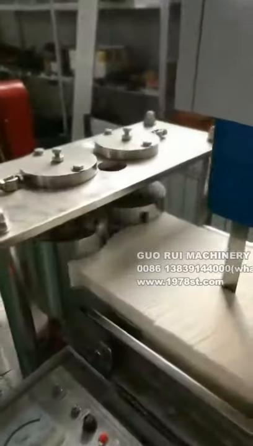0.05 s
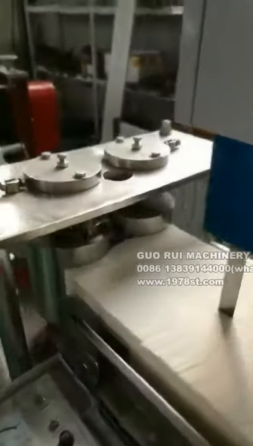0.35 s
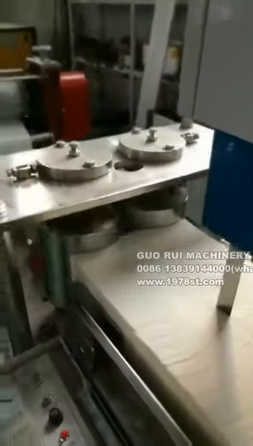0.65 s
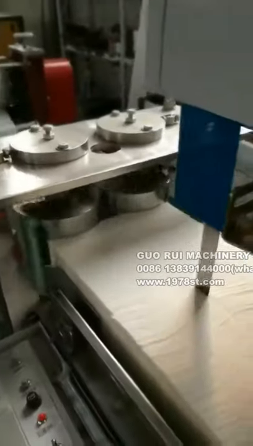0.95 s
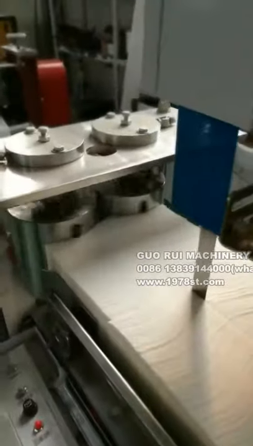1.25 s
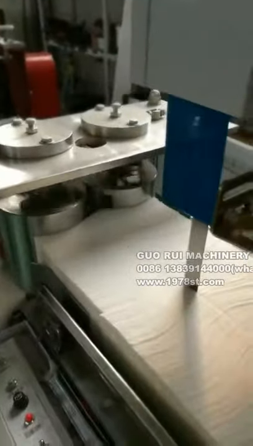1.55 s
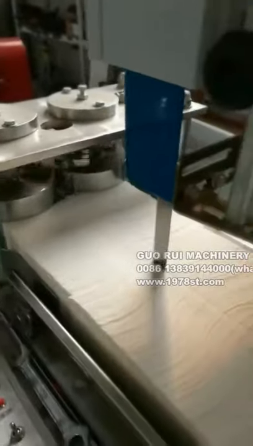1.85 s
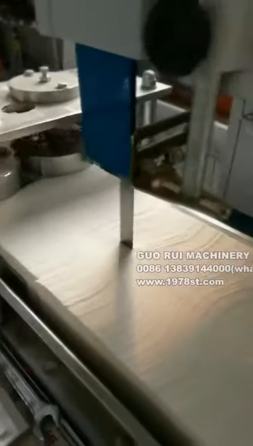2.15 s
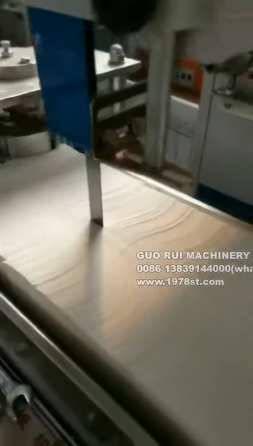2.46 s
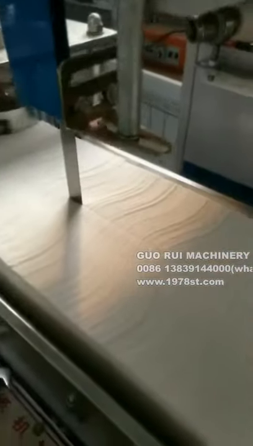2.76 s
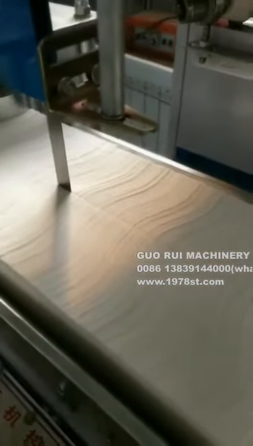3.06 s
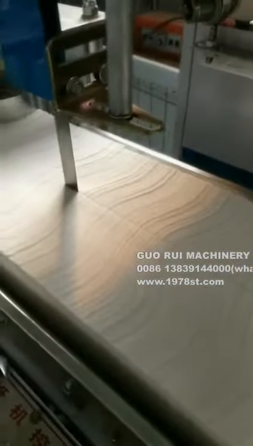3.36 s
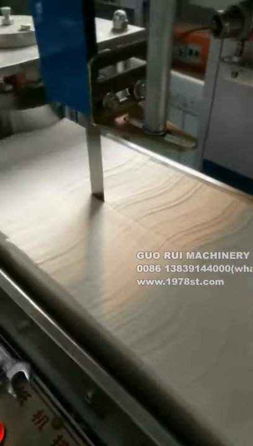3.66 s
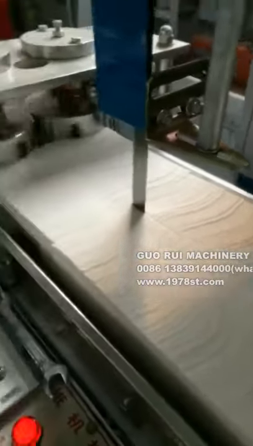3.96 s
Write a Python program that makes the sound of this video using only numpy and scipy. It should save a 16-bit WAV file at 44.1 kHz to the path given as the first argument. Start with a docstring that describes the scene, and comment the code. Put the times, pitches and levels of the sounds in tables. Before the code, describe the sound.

A band knife machine runs, its blade rasping and ringing rhythmically over a motor drone.

```python
"""A band knife runs over a stack of tissue paper, heard from close by in a workshop.
Twice per lap a high spot of the steel band scrapes past: once with a rasp, once with a knock and a
short bright ring of stick-slip oscillation. Sliding friction makes the band hiss in its guides and
excites narrow resonances. Behind it, motor and wheels drone and loose parts rattle."""
import sys
import numpy as np
from scipy import signal
from scipy.io import wavfile

SR = 44100
rng = np.random.default_rng(int(sys.argv[2]) if len(sys.argv) > 2 else 0)


def to_wav(sig):
    """Store sig (one row per channel, or 1-D mono) as 16-bit WAV at the path in sys.argv[1].

    Samples outside -1..1 are clipped; the rate is SR.
    """
    pcm = np.clip(np.atleast_2d(sig), -1, 1) * 32767
    pcm = np.round(pcm).astype(np.int16)
    wavfile.write(sys.argv[1], SR, pcm.T)  # frames by channels


N = 176400
T = np.arange(N) / SR
LAP_S, FIRST_RASP_S, FIRST_RING_S = .3394, .1535, .326  # period of the band; its first two passes
STRIKE_SHAPE = (.003, .0048, .014)  # attack, hold and release in seconds


def from_db(db):
    """Amplitude ratio of a level in decibels."""
    return 10 ** (np.asarray(db) / 20)


def unit_rms(x):
    """Normalisation to a mean square of one."""
    return x / np.sqrt(np.mean(x ** 2) + 1e-20)


def level(rows):
    """Gain over time, interpolated between (seconds, dB) points."""
    return from_db(np.interp(T, *np.transpose(rows)))


def at_hz(rows, hz):
    """Interpolation along a logarithmic frequency axis."""
    frequencies, values = np.transpose(rows)
    return np.interp(np.log(hz), np.log(frequencies), values)


def pan(db):
    """Constant-power panning; the balance db is left level minus right level."""
    return unit_rms(from_db(np.array([[db], [-db]]) / 2))


def drift(rate_hz):
    """Random fluctuation of rms 1: noise low-passed at rate_hz."""
    step, settle = 40, 2000
    r = np.exp(-2 * np.pi * rate_hz * step / SR)
    noise = rng.standard_normal(N // step + settle + 2)
    slow = signal.lfilter([1], [1, -2 * r, r * r], noise)[settle:]
    return np.interp(np.arange(N) / step, np.arange(len(slow)), unit_rms(slow))


def tone(hz, waver_hz, rate_hz):
    """Random frequency modulation of a sine of rms 1."""
    cycles = rng.random() + np.cumsum(hz + waver_hz * drift(rate_hz)) / SR
    return np.sqrt(2) * np.sin(2 * np.pi * cycles)


def swell(s, attack, hold, release):
    """Exponential rise and decay about a plateau centred on s; all in seconds."""
    return np.exp(np.minimum(T - s + hold / 2, 0) / attack - np.maximum(T - s - hold / 2, 0) / release)


def passes(first_s, dbs, shape):
    """Periodic excitation: one swell per lap, each at its own level."""
    lap = np.clip(np.round((T - first_s) / LAP_S), 0, len(dbs) - 1).astype(int)
    return from_db(dbs)[lap] * swell(first_s + LAP_S * lap, *shape)


def rubbed(modes):
    """Forced resonance: friction noise drives damped modes, reaching each side by a different path."""
    out, friction = 0, rng.standard_normal((2, N))
    for hz, width_hz, db, pan_db in modes:
        r = np.exp(-np.pi * width_hz / SR)
        ringing = signal.lfilter([1, 0, -1], [1, -2 * r * np.cos(2 * np.pi * hz / SR), r * r], friction)
        out = out + from_db(db) * pan(pan_db) * unit_rms(ringing)
    return out


# Likeness of the two sides. Each row: frequency in Hz, correlation coefficient.
CORRELATION = [(150, 0.96), (270, 0.76), (370, -0.47), (480, -0.74), (750, -0.48), (1050, 0.34),
               (1600, 0.31), (3000, -0.25), (5000, -0.061), (9500, 0.37), (13500, 0.99)]
# Direction of the noise. Each row: frequency in Hz, balance in dB.
BALANCE = [(200, 0.5), (300, -4.5), (520, 3), (750, 1.5), (1200, -1), (2200, 2.5), (5000, -0.5), (6800, 9),
           (8500, 22), (10000, -23), (12000, -1.5)]
def banded_noise(spectrum, flicker_db):
    """Partially coherent stereo noise of rms 1, whose bands flicker independently."""
    out, edges = 0, np.geomspace(22, 17000, 27)
    white = rng.standard_normal((2, 2, N))
    for k, (low, high) in enumerate(zip(edges, edges[1:])):
        bandpass = signal.butter(2, [low, high], "band", fs=SR, output="sos")
        mid, side = signal.sosfilt(bandpass, white[k % 2])
        hz = np.sqrt(low * high)
        alike = np.clip(at_hz(CORRELATION, hz), -1, 1)
        pair = np.sqrt(1 + alike) * mid + np.sqrt(1 - alike) * side * [[1], [-1]]
        gain = from_db(at_hz(spectrum, hz) + flicker_db * drift(18.4))
        out = out + gain * pan(at_hz(BALANCE, hz)) * pair
    return unit_rms(out)


def workshop(x, t60_s=.32):
    """Reverberation: echoes decay exponentially in eight feedback delays a side."""
    out = np.zeros((2, N))
    for k, lag in enumerate((rng.uniform(.011, .045, 16) * SR).astype(int)):
        loop, gain = x[k % 2].copy(), from_db(-60 * lag / SR / t60_s)
        for i in range(lag, N, lag):
            loop[i:i + lag] += gain * loop[i - lag:i][:N - i]
        out[k % 2] += (loop - x[k % 2]) * (-1) ** (k // 2)
    return out / 2


# Echoes off table and housing. Each row: left delay in seconds, right delay in seconds, gain in dB.
REFLECTIONS = [(.0029, 0.0031, -15.5), (.0047, .0041, -13.5), (.0073, 0.0098, -13)]
def reflected(x):
    """Comb filtering: short echoes from nearby steel interfere with the direct sound."""
    return x + sum(from_db(db) * np.array([np.interp(T - s, T, side) for s, side in zip(delays, x)])
                   for *delays, db in REFLECTIONS)


# Steady tones of the drive; those at 126.4, 132.5 and 138.5 Hz are harmonics of the lap rate, like the wheel
# tone. Each row: frequency in Hz, relative level in dB.
DRIVE_TONES = [(63.1, -47), (70.7, -46), (126.4, -41), (132.5, -43), (138.5, -41), (158, -46), (198.6, -42),
               (212, -41), (273.3, -42)]
# The wheel's five throbs per lap. Each row: time after the rasp in seconds, relative level in dB.
WHEEL_THROBS = [(.03, -23.5), (0.101, -30), (.177, -29.5), (0.248, -28), (0.284, -28.5)]
# Rumble of the frame. Each row: frequency in Hz, relative spectral density in dB.
RUMBLE_SPECTRUM = [(25, -42), (33, -36), (47, -13), (65, -13), (85, -8), (115, -2.5), (145, 0), (175, -3),
                   (215, 1.5), (280, -3), (360, -11.5), (600, -23), (1500, -52)]
# Loudness of the drive. Each row: time in seconds, gain in dB.
DRIVE_LEVEL = [(0, 2), (.4, 1.5), (.7, -1), (1.1, 1.5), (1.45, 0.5), (1.64, -3), (1.9, 0), (2.6, 0),
               (3.3, -1.5), (4, -1)]
def drive():
    """Forced vibration: steady drive tones and an amplitude-modulated wheel tone over the frame's rumble."""
    hum = sum(from_db(db + .5) * tone(hz, waver_hz=.31, rate_hz=4.8) for hz, db in DRIVE_TONES)
    one_lap = sum(from_db(db) * swell(LAP_S + lag_s, .015, .017, .021) for lag_s, db in WHEEL_THROBS)
    # The throbs' flanks overlap into the neighbouring laps.
    throb = sum(np.interp((T - FIRST_RASP_S) % LAP_S + k * LAP_S, T, one_lap) for k in range(3))
    wheel = throb * tone(141.3, waver_hz=1.3, rate_hz=14)
    rumble = from_db(-26.3) * banded_noise(RUMBLE_SPECTRUM, flicker_db=1.3)
    return level(DRIVE_LEVEL) * (hum + wheel + rumble)


# Level of the rattle and hiss, briefly ducked as by a limiter after the first loud ring.
# Each row: time in seconds, gain in dB.
RATTLE_HISS_LEVEL = [(0, 2), (.31, 5.5), (.35, 0.5), (.5, 3.5), (.6, 3), (1.45, 1.5), (1.65, 0.5), (2.3, 0),
                     (3, 1.2), (4, -1)]
def rattle(knocks_per_s=90, t60_s=.077):
    """Impulse response: loose parts knock at random, each knock ringing one damped panel mode."""
    out, modes_hz = np.zeros((2, N)), np.geomspace(679, 1602, 20)
    impulses = (rng.random(N) < knocks_per_s / SR) * rng.uniform(.3, 1, N)
    struck_mode = rng.integers(0, len(modes_hz), N)
    r = from_db(-60 / (t60_s * SR))
    for k, hz in enumerate(modes_hz):
        w = 2 * np.pi * hz / SR
        force = impulses * (struck_mode == k) + 1e-18
        ringing = signal.lfilter([0, np.sin(w)], [1, -2 * r * np.cos(w), r * r], force)
        out += unit_rms(rng.standard_normal((2, 1))) * ringing
    return from_db(-34.5) * level(RATTLE_HISS_LEVEL) * unit_rms(out)


# Shudders of the guide plate. Each row: centre in seconds, gain in dB.
SHUDDERS = [(.08, -28), (1.48, -29.5)]
# Its modes. Each row: frequency in Hz, bandwidth in Hz, relative level in dB, balance in dB.
PLATE_MODES = [(499, 41, -3, -3), (555, 52, -10, 4), (770, 47, -7, -5)]
def shudder():
    """Plate resonance: the guide plate's low modes swell briefly."""
    return sum(from_db(db) * swell(s, .021, .045, .025) for s, db in SHUDDERS) * rubbed(PLATE_MODES)


# Hiss of the sliding band. Each row: frequency in Hz, relative spectral density in dB.
HISS_SPECTRUM = [(40, -30), (200, -29), (380, -11.5), (520, 2.5), (680, -1.5), (950, -2), (1400, -4),
                 (2000, -10), (2900, -8), (3900, -15), (5300, -15), (6600, -17.5), (8500, -18),
                 (11500, -30.5), (15500, -25)]
# Resonances of the band, the guide's hiss and the guide's whistle.
# Each row: frequency in Hz, bandwidth in Hz, relative level in dB, balance in dB.
BAND_MODES = [(463.3, 9, -38, 7.5), (500.6, 27, -38.5, 2.5), (548, 36, -36.5, 12.5), (757, 92, -38.5, 0),
              (864, 13, -39.5, 13), (1055, 20, -36.5, 0.5), (1205, 29, -43, -1)]
GUIDE_MODES = [(5310, 180, -43, 4.4), (8320, 900, -39, 20)]
WHISTLE_MODE = [(2540, 45, -42, -1)]
# Loudness of the band's resonances and of the whistle. Each row: time in seconds, gain in dB.
SINGING_LEVEL = [(0, 7.5), (.4, 3.5), (.8, 3.5), (1.3, 1.5), (1.49, 5), (1.6, 0), (2.5, -1.5), (4, -1.5)]
WHISTLE_LEVEL = [(0, 1), (2.6, -2.5), (2.95, 1.5), (3.45, 1.5), (3.75, -3)]
def running_band(snags_per_s=12, snag_decay_s=.0048):
    """Sliding friction in paper and guides: broadband hiss, random snags and faint resonances."""
    snags = (rng.random(N) < snags_per_s / SR) * rng.uniform(.3, 1, N)
    ticks = signal.lfilter([1], [1, -np.exp(-1 / (snag_decay_s * SR))], snags + 1e-18)
    pressure = from_db(1.1 * drift(11.7) + .71 * drift(130))
    hiss = (from_db(-26.3) + from_db(-31) * ticks) * banded_noise(HISS_SPECTRUM, flicker_db=1.57)
    lap_swell = from_db(.54 * np.cos(2 * np.pi * (T - .12) / LAP_S))
    guide = rubbed(GUIDE_MODES) + level(WHISTLE_LEVEL) * rubbed(WHISTLE_MODE)
    singing = level(SINGING_LEVEL) * rubbed(BAND_MODES)
    return pressure * (lap_swell * level(RATTLE_HISS_LEVEL) * reflected(hiss) + singing + guide)


# Squeals of the band. Each row: centre in seconds, level in dB.
SQUEALS = [(0.021, -26), (0.138, -21), (.29, -20.5), (.318, -20.5)]
def squeals():
    """Stick-slip oscillation: the band briefly squeals in its guide."""
    envelope = sum(from_db(db) * swell(s, .0072, .019, .014) for s, db in SQUEALS)
    return envelope * pan(db=5) * tone(1060, waver_hz=11.3, rate_hz=73)


# Scrape of the high spot. Each row: frequency in Hz, relative spectral density in dB.
SCRAPE_SPECTRUM = [(40, -35), (300, -9), (800, 6), (1400, 2), (2000, -10), (2900, 1), (4000, -5.5),
                   (5300, -11.5), (8500, -11), (11500, -29.5), (15500, -19.5)]
def chatter(depth_db=1.5):
    """Frictional chatter: scraping noise under fast random amplitude modulation."""
    return unit_rms(from_db(depth_db * drift(350))) * banded_noise(SCRAPE_SPECTRUM, flicker_db=2.5)


def contact(first_s, dbs, shape):
    """Contact pressure: on each lap a light touch, then the main scrape."""
    touch = from_db(-6) * passes(first_s - .015, dbs, (.008, .0059, .0066))
    return np.maximum(passes(first_s, dbs, shape), touch)


def clink(hz):
    """Decorrelation: an unsteady steel mode reaches each side by a different path."""
    return pan(db=9.5) * np.array([tone(hz, waver_hz=75, rate_hz=260) for side in range(2)])


# The rasping pass, lap by lap. Each row: scrape, mode and clink gains in dB, clink frequency in Hz.
RASP_PASSES = [(3, 4.5, -14.5, 2430), (0.5, 2.5, -17.5, 2440), (-0.5, 1.5, -22.5, 2480),
               (4.5, 4, -21, 2520), (1, 1.5, -22, 2490), (3.5, 1, -24.5, 2510), (3.5, 1.5, -20.5, 2590),
               (1.5, 0.5, -26, 2410), (1.5, 0.5, -26, 2470), (1.5, 0.5, -23, 2550), (2.5, 2, -25, 2410),
               (-0.5, 0.5, -23.5, 2700)]
# Rasped steel. Each row: frequency in Hz, bandwidth in Hz, relative level in dB, balance in dB.
RASP_MODES = [(1077, 44, -29.5, -2), (1173, 56, -31.5, 13), (2540, 230, -31.5, 4), (2860, 150, -40, 0),
              (4450, 26, -37, 8), (6470, 65, -38, 14), (8430, 150, -34.5, 16)]
# Click on the guide's edge. Each row: frequency in Hz, relative spectral density in dB.
CLICK_SPECTRUM = [(40, -40), (1500, -12), (3000, -1), (8000, -0.5), (11500, -13), (15500, -11)]
def rasps(grit):
    """Transient friction: the high spot clicks on the guide's edge, then scrapes and excites the steel."""
    scrape_db, modes_db, clink_db, clink_hz = np.transpose(RASP_PASSES)
    click_shape, rasp_shape = (.0006, .00077, .0041), (.003, .0076, .0155)
    click_envelope = from_db(-25.5) * passes(FIRST_RASP_S - .018, scrape_db, click_shape)
    click = click_envelope * banded_noise(CLICK_SPECTRUM, flicker_db=3)
    scrape = from_db(-22) * contact(FIRST_RASP_S, scrape_db, rasp_shape) * grit
    steel = contact(FIRST_RASP_S, modes_db, rasp_shape) * rubbed(RASP_MODES)
    pitch = np.interp(T, FIRST_RASP_S + LAP_S * np.arange(len(clink_hz)), clink_hz)
    clinks = passes(FIRST_RASP_S, clink_db, STRIKE_SHAPE) * clink(pitch)
    return click + reflected(scrape) + steel + clinks


# Struck steel. Each row: frequency in Hz, bandwidth in Hz, relative level in dB, balance in dB.
KNOCK_MODES = [(1092, 55, -27.5, 8), (1562, 70, -25.5, -5), (2280, 160, -35, 3), (3330, 490, -33.5, 13),
               (6300, 100, -36, 5)]
# The ringing pass, lap by lap. Each row: scrape, knock, clink and ring gains in dB, ring balance in dB.
RING_PASSES = [(4.5, 0.5, -20, 17.5, -9.5), (3, -1, -24.5, 9, -12), (3, 0, -25, 3.5, -12),
               (5, 3.5, -24, 0, 2), (2.5, 1.5, -38, -1, 10), (4, -5, -30, 2.5, 4), (2.5, -1, -29, 3, 8),
               (1, 2, -32, -2, 4), (2.5, -2, -34, 2, 1), (0, 1, -27, -5, 1), (4.5, 1.5, -28, -1.5, 9)]
def knocks(grit):
    """Impact excitation: on its ringing pass the high spot strikes the steel inside a softer scrape."""
    scrape_db, knock_db, clink_db, _, _ = np.transpose(RING_PASSES)
    strike_s = FIRST_RING_S - .0033  # just before the scrape peaks
    scrape = from_db(-24.3) * contact(FIRST_RING_S, scrape_db, shape=(.008, .0063, .017)) * grit
    knock = passes(strike_s, knock_db, STRIKE_SHAPE) * rubbed(KNOCK_MODES)
    return reflected(scrape) + knock + contact(strike_s, clink_db, STRIKE_SHAPE) * clink(hz=2420)


def rings():
    """Stick-slip locks onto two close modes: a rough, bright ring once per lap."""
    envelope = sum(from_db(db - 33) * pan(pan_db) * swell(FIRST_RING_S + k * LAP_S, .0041, .012, .0071)
                   for k, (*_, db, pan_db) in enumerate(RING_PASSES))
    upper = tone(4091, waver_hz=30, rate_hz=190)
    lower = from_db(-11.5) * tone(3900, waver_hz=30, rate_hz=170)
    roughness = from_db(3.5 * drift(280))
    return envelope * roughness * (upper + lower)


def scene():
    """Superposition of all sources; only the rasps and knocks feed the reverberation."""
    grit = chatter()
    contacts = rasps(grit) + knocks(grit)
    machine = drive() + running_band() + rattle() + shudder()
    return machine + rings() + squeals() + contacts + from_db(-11) * workshop(contacts)


def record(dry):
    """A steep elliptic low-pass filter removes the highest treble."""
    return signal.sosfilt(signal.ellip(12, .1, 80, 15800, fs=SR, output="sos"), dry)


dry = scene()
out = record(dry)
to_wav(out)
```